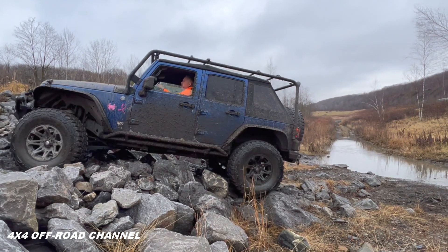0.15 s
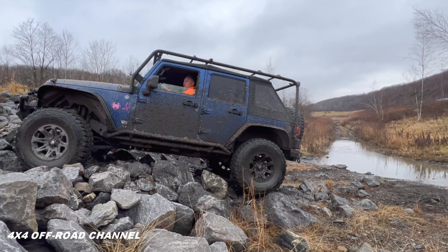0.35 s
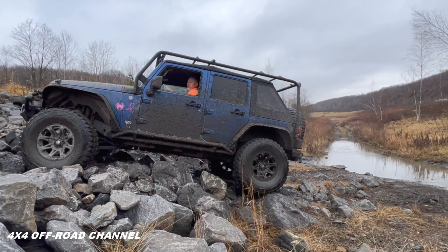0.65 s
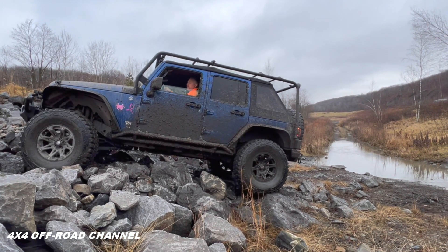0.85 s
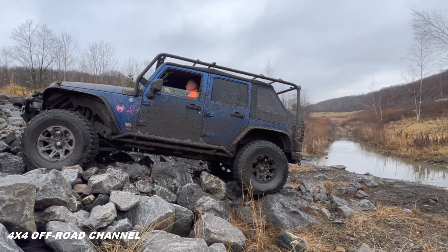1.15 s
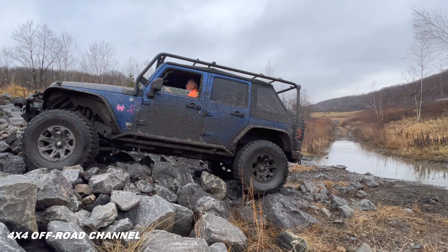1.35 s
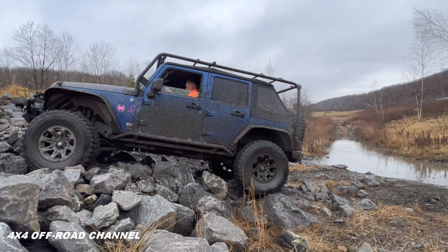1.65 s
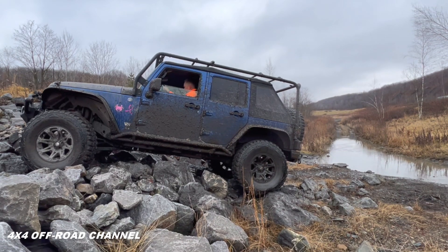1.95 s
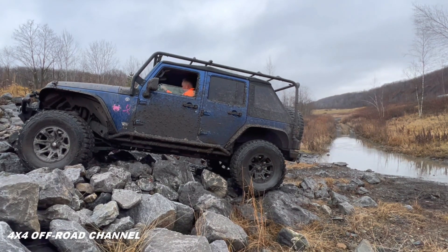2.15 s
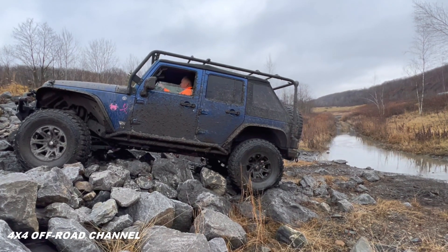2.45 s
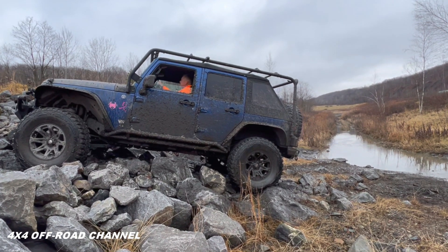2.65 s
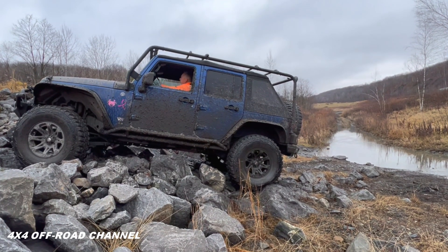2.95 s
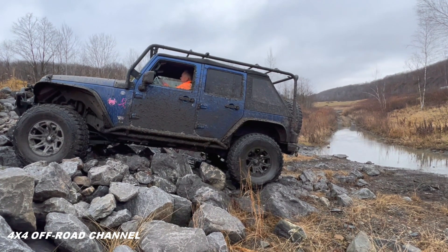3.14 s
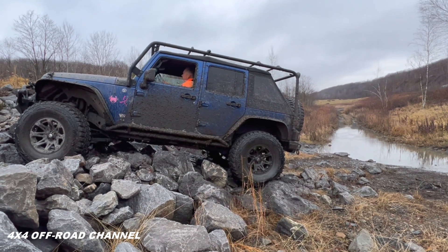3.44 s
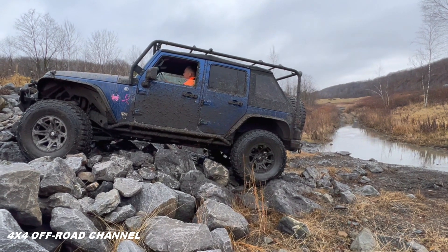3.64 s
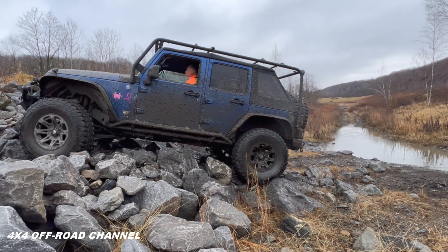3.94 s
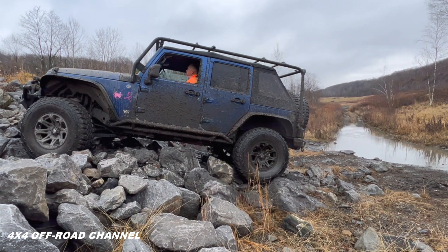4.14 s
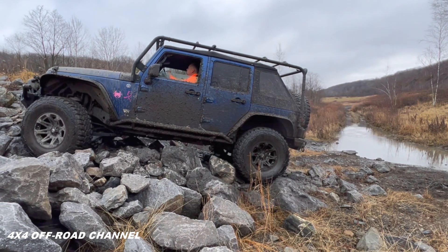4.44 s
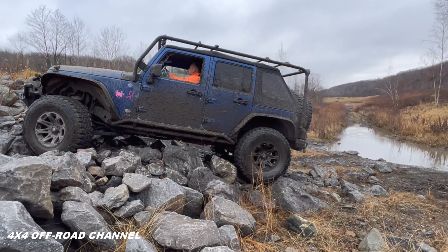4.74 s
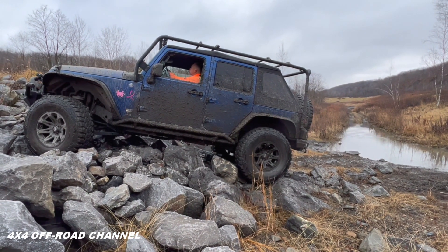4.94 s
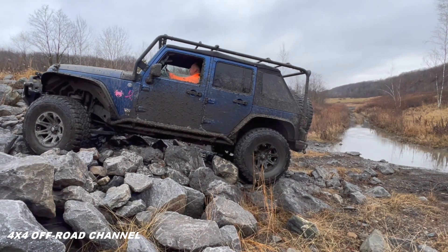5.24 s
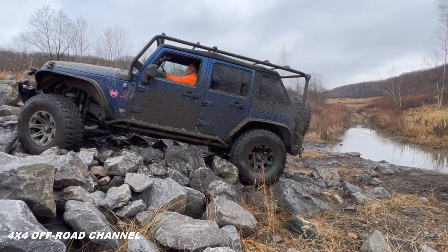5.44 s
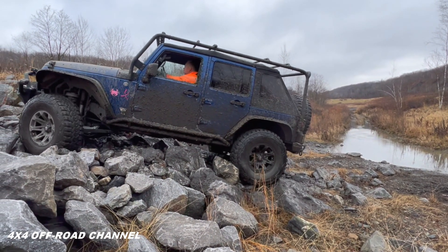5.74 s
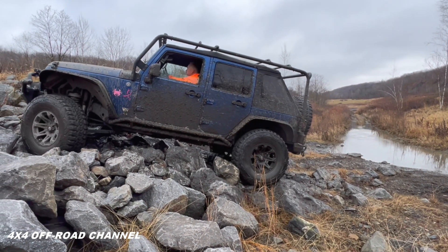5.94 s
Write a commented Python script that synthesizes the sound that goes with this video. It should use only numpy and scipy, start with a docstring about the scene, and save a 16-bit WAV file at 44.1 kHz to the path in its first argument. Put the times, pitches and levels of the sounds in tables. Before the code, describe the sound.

Outdoors, a few metres from the microphone, an off-road vehicle's engine runs low and uneven with a light mechanical clatter. Stones clack under the wheels, and a tyre drops with one hard knock and thud. After a stretch of quiet rumbling, the revs rise and the exhaust grows loud and stays up, while the tyres crunch over boulders, the rims squeak briefly and more stones knock together.

```python
"""Four-wheel-drive on boulders

A V6 crawls up a rock pile a few metres away in open country, then pulls from idle to twice the revs.
Firings boom through the exhaust; the block clatters, the fan hisses and, above idle, the belt chirps
once a lap. Loose stones knock under the wheels, tyres grind over rock, suspension and rims creak."""
import sys
import numpy as np
from scipy import signal
from scipy.fft import rfft, irfft, next_fast_len
from scipy.io import wavfile
from scipy.ndimage import uniform_filter1d

SR = 44100
rng = np.random.default_rng(int(sys.argv[2]) if len(sys.argv) > 2 else 0)


def to_wav(s):
    """Save 16-bit WAV."""
    ch = np.atleast_2d(s).T  # columns
    pcm = np.round(np.clip(ch, -1, 1) * 32767)  # PCM
    wavfile.write(sys.argv[1], SR, pcm.astype(np.int16))


N = 268569
TIME = np.arange(N) / SR
FFT_SIZE = 2 * next_fast_len(N * 5 // 9)
FREQ = np.maximum(np.fft.rfftfreq(FFT_SIZE, 1 / SR), 1)
IDLE_HZ = 19  # crank turns per second

# EQ curves for the noise of panels, fan, belt, block and grit.
# Each row: frequency in Hz, relative level in dB.
RUMBLE_EQ = [(15, -32), (36, -6), (50, -3), (150, -6), (260, -18), (600, -40), (8000, -75)]
FAN_EQ = [(1200, -10), (2500, 2.5), (3300, 1), (4100, 1.5), (4900, 2), (6300, -0.5), (7500, -1), (9000, -6),
          (10300, -11), (11600, -0.5), (13000, -22), (13800, -27), (14600, -11), (15500, -8)]
BELT_EQ = [(1500, -11), (3000, -3), (4400, 1.5), (5200, -0.5), (6300, 7.5), (7600, -0.5), (10000, -10),
           (11800, -3), (15500, -26)]
BLOCK_EQ = [(150, 7.5), (280, 3), (420, -3.5), (600, 1.5), (790, 1), (1020, -13), (1300, -5), (1600, -11.5),
            (1950, -12.5), (2300, -16), (2800, -28), (4000, -46), (8000, -63)]
GRIT_EQ = [(1000, -35), (2500, 1), (4000, 1), (6500, 2.5), (9000, -4), (10300, -8.5), (11800, -3.5),
           (15500, -21)]
# Resonances of pulleys and covers, of stones and underbody, and of the exhaust pipe.
# Each row: centre in Hz, width in Hz, relative level in dB.
PULLEY_MODES = [(1250, 61, 4), (1795, 74, 8), (2850, 59, 0), (4170, 96, -9.5), (6600, 91, 0)]
STONE_BODY_MODES = [(335, 56, 2.5), (541, 133, 2.5), (683, 66, 3.5), (796, 25, 2), (880, 140, 0),
                    (1184, 13, 1.5), (1295, 160, -1), (1582, 120, -3.5), (1933, 260, -4.5), (2018, 67, -5),
                    (2266, 47, -7.5), (2536, 83, -11), (2890, 110, -9.5)]
PIPE_MODES = [(57, 15, 2), (69, 23, 5), (122, 29, 2), (142, 14, 0), (196, 16, -12), (232, 19, 0),
              (291, 49, -25), (352, 16, -17), (425, 20, -21), (500, 16, -18), (500, 200, -30)]
# Suspension creaks and rim squeals. Each row: start and length in seconds, pitch in Hz, level in dB.
CREAK_CUES = [(0.284, 0.096, 433, -39.5), (2.286, 0.11, 425, -48.5), (5.196, 0.032, 1970, -34.5),
              (5.305, 0.058, 1200, -27.5), (5.405, 0.028, 1926, -26), (5.48, 0.03, 1620, -31)]
# Tyres grinding on rock. Each row: start and length in seconds, underbody and grit levels in dB.
SCRAPE_CUES = [(0, 0.1, -33.5, -46), (0.077, 0.36, -45, -52.5), (0.446, 0.26, -49, -57),
               (0.626, 0.13, -48, -54.5), (.82, 0.28, -45.5, -52), (1.074, 0.33, -46.5, -58.5),
               (1.131, 0.026, -29, -51.5), (1.316, 0.26, -51, -55), (1.698, 1, -58, -58.5),
               (3.19, 0.73, -60, -57), (4.464, 0.037, -26.5, -43.5), (5.197, 0.052, -32.5, -41),
               (5.236, 0.25, -27.5, -40.5), (5.315, 0.062, -31, -42), (5.379, 0.1, -31.5, -36.5),
               (5.484, 0.054, -30.5, -38), (5.76, 0.36, -36.5, -41)]
# Stones knocking. Each row: start in seconds, level in dB, pitch in Hz.
KNOCK_CUES = [(.157, -28.5, 554), (.235, -28, 402), (.589, -28, 820), (.958, -29, 694), (1.098, -26, 900),
              (1.127, -7.5, 760), (1.166, -19, 794), (1.464, -17, 620), (1.479, -24, 660), (2.78, -40, 740),
              (4.473, -18, 696), (5.545, -15.5, 780), (5.616, -23, 756), (5.742, -16, 544),
              (5.832, -8, 810), (5.868, -16, 644)]
# A tyre dropping onto a stone. Each row: start in seconds, level in dB.
THUMP_CUES = [(0.956, -22), (1.154, -8.5), (1.479, -22.5)]
# The throttle ride. Each row: time in seconds, crank speed in Hz, exhaust level in dB.
ENGINE_RIDE = [(0.0, 17.1, -34.9), (0.12, 16.39, -34.1), (0.6, 18.79, -27.2), (1.02, 19.58, -28.4),
               (1.6, 18.48, -29.7), (1.74, 17.53, -30.4), (1.86, 17.34, -38.2), (2.05, 17.64, -33.2),
               (2.35, 19.36, -27.8), (3.0, 19.35, -30.3), (3.37, 17.35, -34.1), (3.5, 18.13, -27.5),
               (4.2, 26.31, -22.4), (4.45, 29.66, -18.4), (4.72, 31.34, -17.3), (4.95, 34.95, -14.1),
               (5.22, 39.1, -15.3), (5.5, 39.57, -15.7), (5.7, 38.31, -14.9), (6.07, 42.72, -15.6)]
# Firing harmonics. Each row: multiple of the crank speed, relative dB at idle, relative dB under load.
FIRING_ORDERS = [(1, -34, -34), (2, -13, -8), (3, -9, -13.5), (4, -8, -4), (5, -15, -16), (6, -6, -12),
                 (7, -15, -14), (8, -9, -11), (9, -15, -14), (10, -12, -16), (11, -19, -17), (12, -12, -17),
                 (13, -24, -24), (14, -24, -24), (15, -18, -21)]


def undb(db):
    """Decibels to gain."""
    return 10 ** (np.asarray(db) / 20)


def unit(x):
    """Scale to rms 1."""
    return x / np.sqrt(np.mean(x ** 2))


def eq_curve(points):
    """Gain over frequency from (Hz, dB) points."""
    hz, db = np.transpose(points)
    return undb(np.interp(np.log(FREQ), np.log(hz), db))


def resonances(modes):
    """Gain over frequency of a set of steep-sided peaks."""
    power = 0
    for hz, width, db in modes:
        detune = (FREQ - hz ** 2 / FREQ) / (2 * width)
        power += (undb(db) / (1 + 2 * detune ** 2)) ** 2
    return np.sqrt(power)


def colour(x, gain):
    """Minimum-phase EQ; white noise keeps its power."""
    cepstrum = irfft(np.log(unit(gain) + 1e-6))
    cepstrum[1:FFT_SIZE // 2] *= 2
    cepstrum[FFT_SIZE // 2 + 1:] = 0
    return irfft(rfft(x, FFT_SIZE) * np.exp(rfft(cepstrum)))[..., :N]


def wander(rate_hz):
    """Smooth random modulation, about 1 deep."""
    hold = max(int(SR / rate_hz), 1)
    steps = np.repeat(rng.standard_normal(N // hold + 1), hold)
    return 1.3 * uniform_filter1d(uniform_filter1d(steps, hold), hold)[:N]


def add(track, start_s, sound):
    """Drop a sound onto a track."""
    i = max(int(start_s * SR), 0)
    track[i:i + len(sound)] += sound[:max(N - i, 0)]


def pan(x, lag_ms, pan_db):
    """Mono to stereo: the left side is lag_ms later and pan_db louder."""
    delays = np.exp(np.outer([-1, 1], 1j * np.pi * FREQ * lag_ms / 1000))
    return irfft(rfft(x, FFT_SIZE) * delays)[:, :N] * undb([[pan_db / 2], [-pan_db / 2]])


def wide_noise(envelope, gain, lag_ms, pan_db, scatter_db):
    """Coloured noise on an envelope: part direct, part scattered to each side by the boulders."""
    direct, *scattered = colour(envelope * rng.standard_normal((3, N)), gain)
    share = undb(scatter_db)
    return (pan(direct, lag_ms, pan_db) + share * np.array(scattered)) / np.sqrt(1 + share ** 2)


def rev_level(crank_hz, idle_db, db_per_octave):
    """Level in dB of a layer that swells as the revs rise above idle."""
    return idle_db + db_per_octave * np.log2(np.maximum(crank_hz / IDLE_HZ, 1))


def panel_rumble(crank_hz):
    """The engine shakes the body panels into a low, unpitched bed."""
    level = undb(rev_level(crank_hz, idle_db=-47, db_per_octave=9))
    return wide_noise(level, eq_curve(RUMBLE_EQ), lag_ms=-.2, pan_db=1, scatter_db=-20)


def fan_hiss(crank_hz, turns):
    """Rushing air pulses twice a crank turn and brightens with speed."""
    flutter = (1 + .08 * np.cos(4 * np.pi * turns)) * undb(.8 * wander(90) + .8 * wander(25))
    air = unit(flutter) * undb(rev_level(crank_hz, idle_db=-54, db_per_octave=13.5))
    crossfade = np.clip((crank_hz - 19) / 14, 0, 1)
    bright = eq_curve(FAN_EQ) * (1 + resonances(PULLEY_MODES))
    dull = bright / (1 + (FREQ / 9300) ** 6)
    return sum(wide_noise(air * np.sqrt(share), tone, lag_ms=-.5, pan_db=3, scatter_db=2)
               for share, tone in [(1 - crossfade, dull), (crossfade, bright)])


def belt_chirps(crank_hz, turns, turns_per_lap=2.9815, patch_at_s=5.014, attack_s=.0029, decay_s=.006):
    """Once a lap a worn patch slips over a pulley: a dry chirp, louder at speed and as the revs climb."""
    envelope, t = np.zeros(N), TIME[:SR // 10]
    laps = np.floor((turns - np.interp(patch_at_s, TIME, turns)) / turns_per_lap)
    starts = np.flatnonzero(np.diff(laps))
    climb_db = .3473 * np.gradient(crank_hz, TIME)
    level_db = rev_level(crank_hz, idle_db=-45, db_per_octave=15.5) + climb_db
    slip = np.clip((crank_hz - IDLE_HZ) / 3, 0, 1)
    chirp = (1 - np.exp(-t / attack_s)) * np.exp(-t / decay_s)
    for i, uneven_db in zip(starts, 2.5 * rng.standard_normal(100)):
        add(envelope, TIME[i], slip[i] * undb(level_db[i] + uneven_db) * chirp)
    # a soft swish as the engine takes up the load
    swish = undb(-54.5) * np.sin(np.linspace(0, np.pi, int(.65 * SR)))
    add(envelope, 3.15, swish)
    tone = eq_curve(BELT_EQ) * (1 + resonances(PULLEY_MODES))
    return wide_noise(envelope, tone, lag_ms=-.5, pan_db=2, scatter_db=3)


def block_clatter(crank_hz, turns):
    """Valves and pistons clatter in a burst at each of three firings a turn."""
    bursts = np.exp(-(3 * turns % 1) / .45) + .6
    strokes = bursts * (1 + .019 * np.cos(2 * np.pi * turns)) * undb(1.35 * wander(50))
    level = undb(rev_level(crank_hz, idle_db=-42.5, db_per_octave=9))
    return wide_noise(unit(strokes) * level, eq_curve(BLOCK_EQ), lag_ms=-.25, pan_db=5.5, scatter_db=0)


def creaks(waver_hz=25):
    """A suspension bush or a rim sticks and slips with a brief wavering tone."""
    track = np.zeros(N)
    for start, length, hz, db in CREAK_CUES:
        progress = np.clip((TIME - start) / length, 0, 1)
        swell = np.sqrt(np.abs(np.sin(np.pi * progress)))
        cycles = np.cumsum(hz + waver_hz * wander(160)) / SR
        track += undb(db) * swell * np.sin(2 * np.pi * cycles)
    return pan(track, lag_ms=0, pan_db=0)


def tyre_scrapes(grain_db=3, carcass_hz=235):
    """Tread slips over rock: dense catches ring the underbody, boom in the tyre and crush grit."""
    body, grit = np.zeros(N), np.zeros(N)
    for start, length, body_db, grit_db in SCRAPE_CUES:
        progress = np.linspace(0, 1, int(length * SR))
        swell = np.sin(np.pi * progress ** .54)  # quick in, slow out
        add(body, start, undb(body_db) * swell)
        add(grit, start, undb(grit_db) * swell)
    catches = unit(undb(grain_db * wander(1500)))
    catches *= undb(1.3 * wander(130) + 1.2 * wander(25))
    ring = wide_noise(catches * body, resonances(STONE_BODY_MODES), lag_ms=0, pan_db=-2, scatter_db=-2.5)
    carcass = resonances([(carcass_hz, 45, 0)])
    boom = wide_noise(catches * body * undb(-5.5), carcass, lag_ms=0, pan_db=5, scatter_db=-13)
    crunch = wide_noise(catches * grit, eq_curve(GRIT_EQ), lag_ms=-.33, pan_db=2, scatter_db=1)
    return ring + boom + crunch


def stone_knocks(ring_cycles=.75, rattle_rise_s=.0058, rattle_t60_s=.11, thump_hz=75, thump_s=.005):
    """A stone tips with a hollow clack and rattles its neighbours; the tyre drops with a thump."""
    hits, rattle, t = np.zeros(N), np.zeros(N), TIME[:SR // 3]
    tail = undb(-10 - 60 * t / rattle_t60_s) * (1 - np.exp(-t / rattle_rise_s))
    for start, db, hz in KNOCK_CUES:
        age = t * hz / ring_cycles
        add(hits, start, undb(db) * age * np.exp(1 - age) * np.sin(2 * np.pi * hz * t))
        add(rattle, start, undb(db) * tail)
    thump = -t / thump_s * np.exp(1 - t / thump_s) * np.sin(2 * np.pi * thump_hz * t)
    for start, db in THUMP_CUES:
        add(hits, start, undb(db) * thump)
    # knocks and thumps stay clear of the deepest bass
    hits = signal.sosfilt(signal.butter(2, 45, "high", fs=SR, output="sos"), hits)
    dull = resonances(STONE_BODY_MODES) / (1 + (FREQ / 1400) ** 4)
    rattles = wide_noise(rattle, dull, lag_ms=-.076, pan_db=4.5, scatter_db=-11)
    return pan(hits, lag_ms=-.28, pan_db=.5) + rattles


def exhaust_boom(crank_hz, turns, level_db, smear_rad=.15):
    """Uneven firing pulses sweep through the fixed resonances of pipe and silencer."""
    load = np.clip((crank_hz - 20) / 12, 0, 1)
    pulses = np.zeros(N)
    for order, idle_db, loaded_db in FIRING_ORDERS:
        strength = undb(idle_db + load * (loaded_db - idle_db) + 1.1 * wander(7))
        # manifold branches of unequal length smear the pulses over the turn
        pulses += strength * np.cos(2 * np.pi * order * turns + smear_rad * order ** 2)
    # no two burns are alike, least of all at idle
    pulses *= 1 + (.16 - .1 * load) * wander(110) + .07 * wander(25)
    pulses += (.11 - .075 * load) * wander(400)
    boom = colour(pulses, resonances(PIPE_MODES) / (1 + (30 / FREQ) ** 4))
    # even out the loudness, then ride it with level_db
    power = uniform_filter1d(uniform_filter1d(boom ** 2, SR // 9), SR // 9)
    return pan(boom / np.sqrt(power) * undb(level_db), lag_ms=-.048, pan_db=1.5)


def scene():
    """Crank speed drives every engine layer; stones, scrapes and creaks land on their cues."""
    times, speeds, levels = np.transpose(ENGINE_RIDE)
    crank_hz = np.interp(TIME, times, speeds)
    exhaust_db = np.interp(TIME, times, levels)
    turns = np.cumsum(crank_hz) / SR
    low_end = exhaust_boom(crank_hz, turns, exhaust_db) + panel_rumble(crank_hz)
    engine_bay = block_clatter(crank_hz, turns) + fan_hiss(crank_hz, turns) + belt_chirps(crank_hz, turns)
    return low_end + engine_bay + stone_knocks() + tyre_scrapes() + creaks()


def record(dry):
    """A steep low-pass at 15650 Hz takes off the very top."""
    return signal.sosfilt(signal.ellip(10, .2, 80, 15650, fs=SR, output="sos"), dry)


dry = scene()
out = record(dry)
to_wav(out)
```